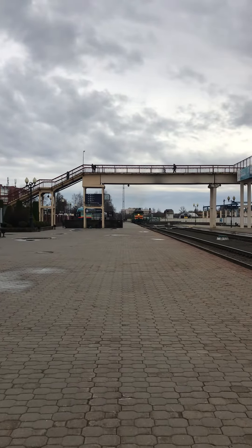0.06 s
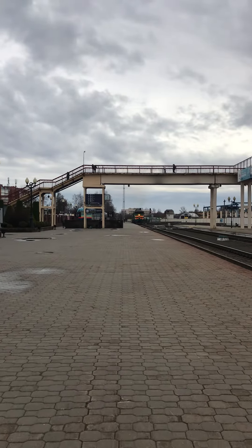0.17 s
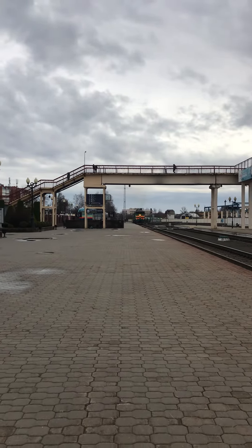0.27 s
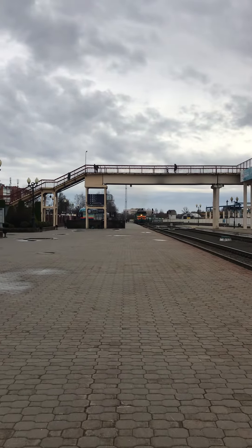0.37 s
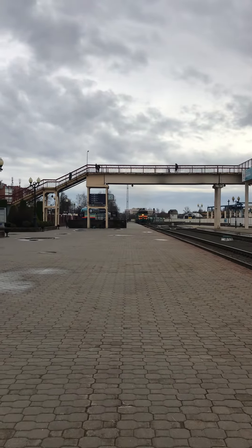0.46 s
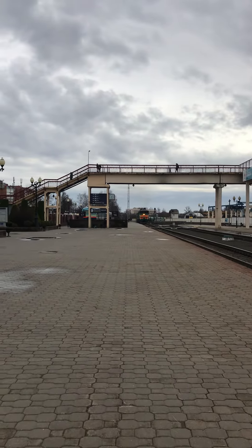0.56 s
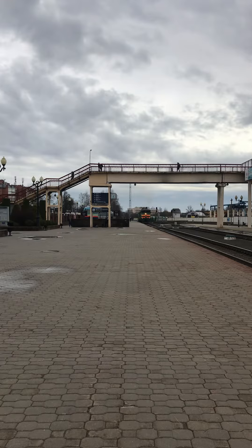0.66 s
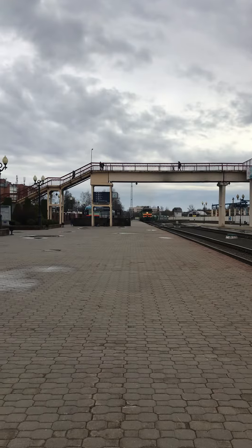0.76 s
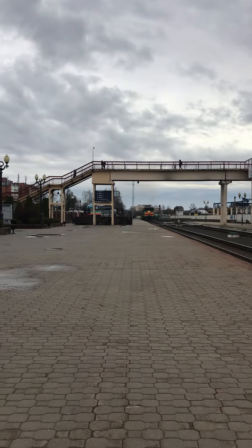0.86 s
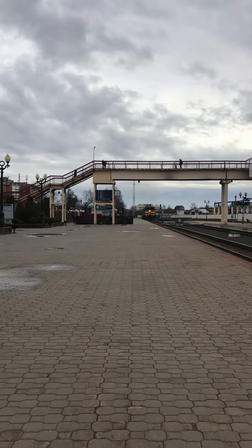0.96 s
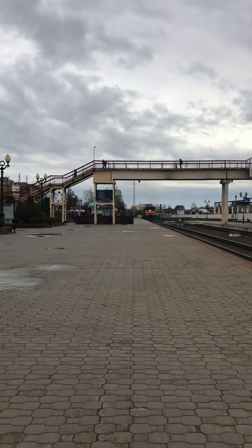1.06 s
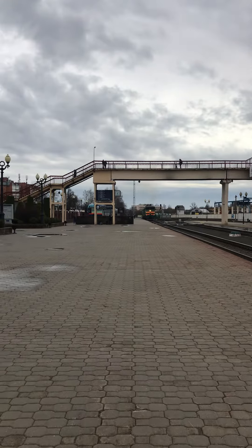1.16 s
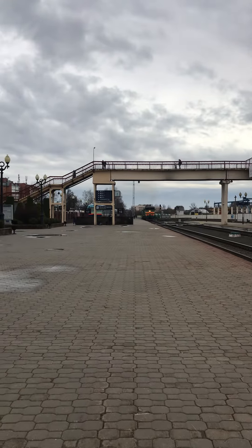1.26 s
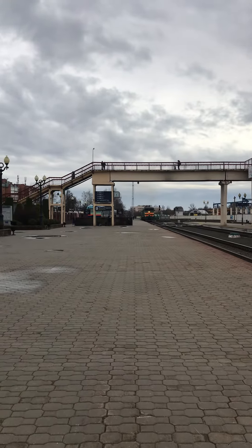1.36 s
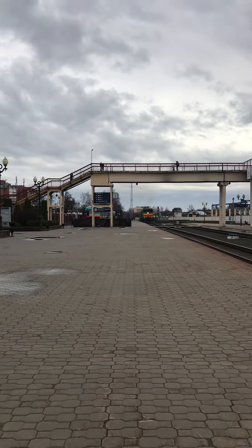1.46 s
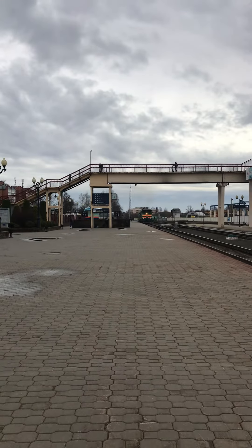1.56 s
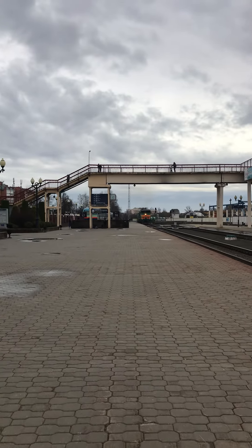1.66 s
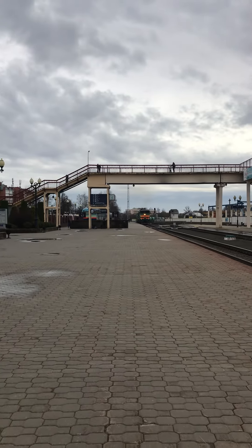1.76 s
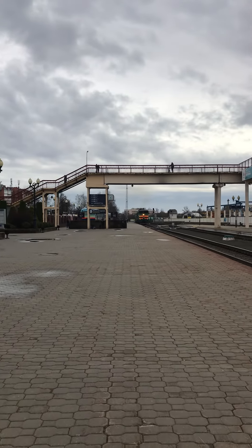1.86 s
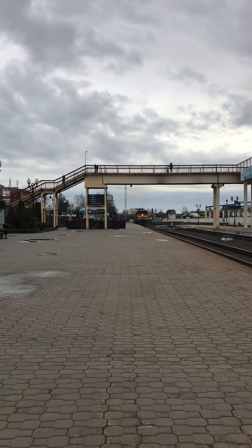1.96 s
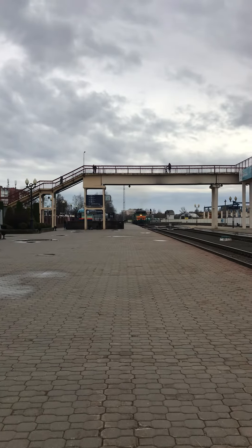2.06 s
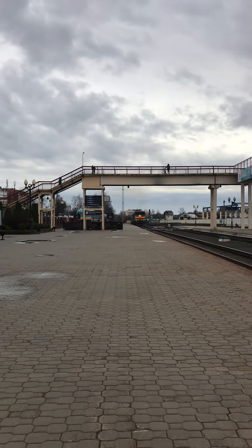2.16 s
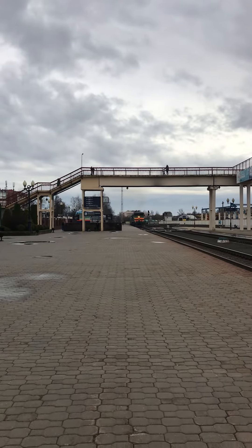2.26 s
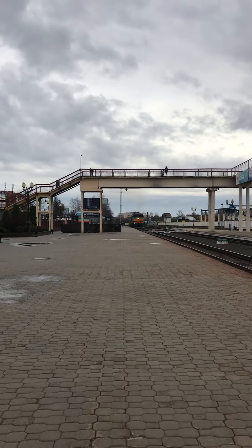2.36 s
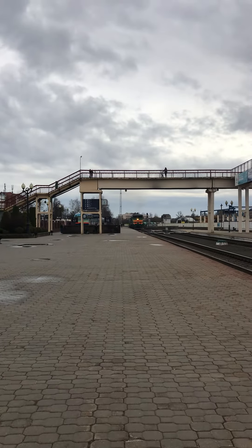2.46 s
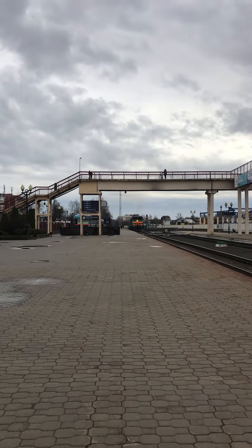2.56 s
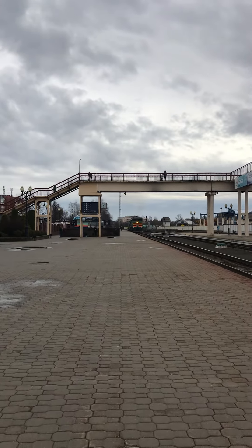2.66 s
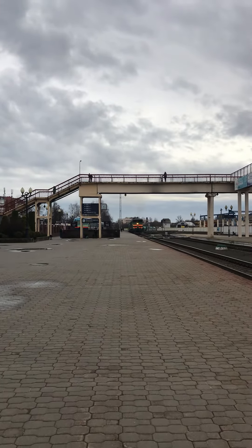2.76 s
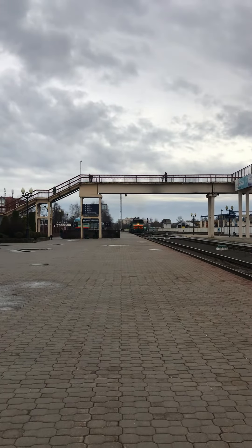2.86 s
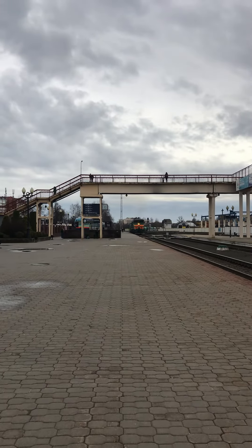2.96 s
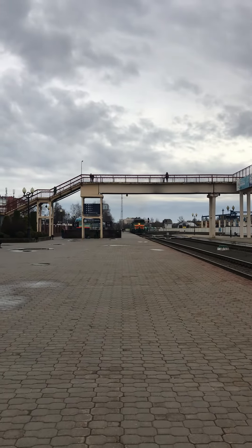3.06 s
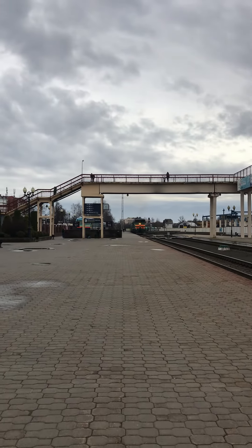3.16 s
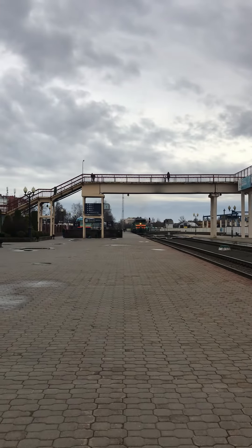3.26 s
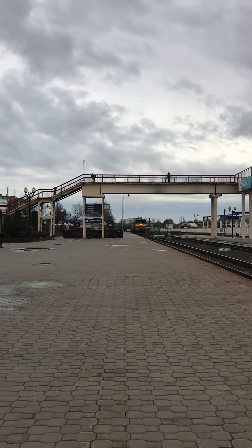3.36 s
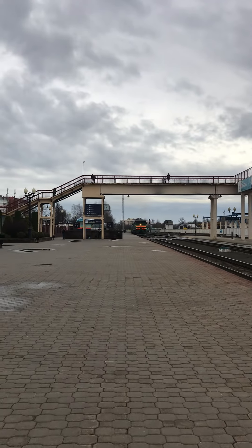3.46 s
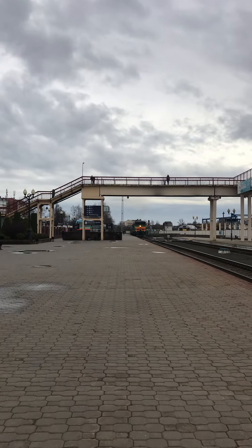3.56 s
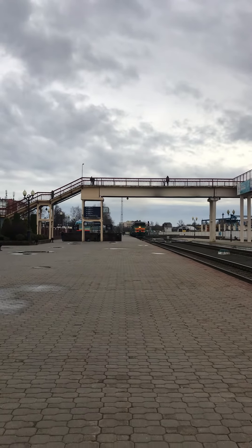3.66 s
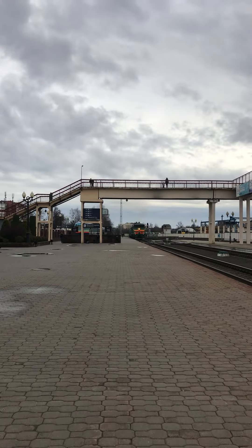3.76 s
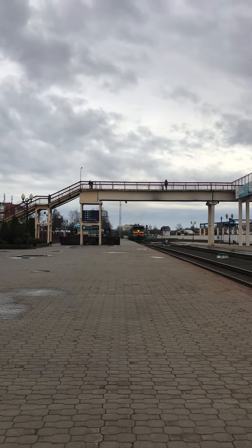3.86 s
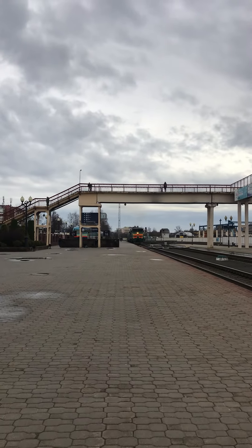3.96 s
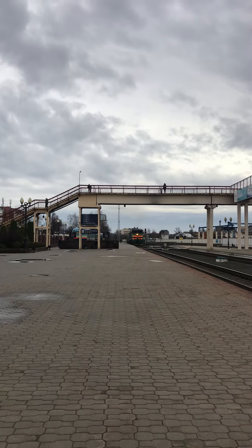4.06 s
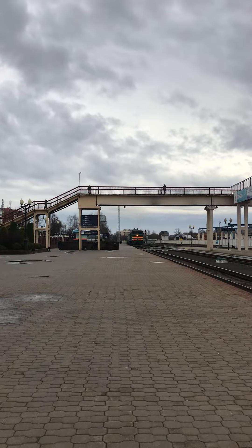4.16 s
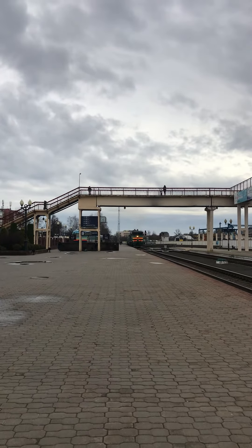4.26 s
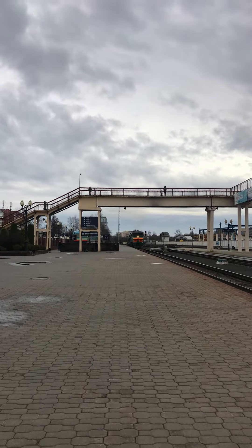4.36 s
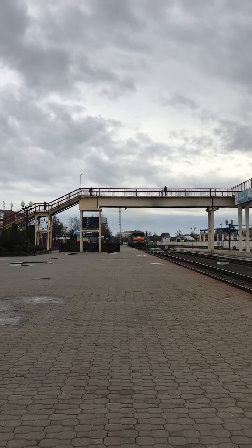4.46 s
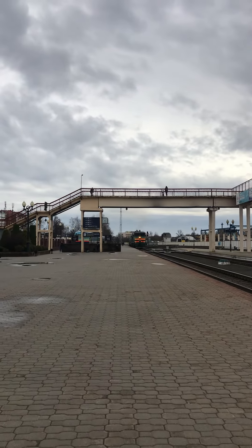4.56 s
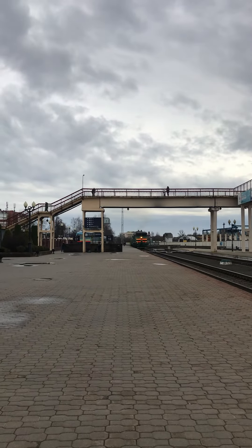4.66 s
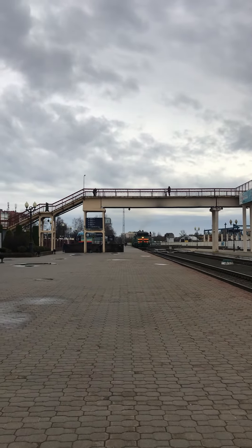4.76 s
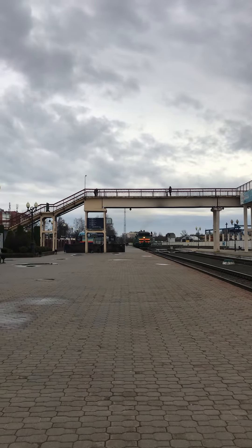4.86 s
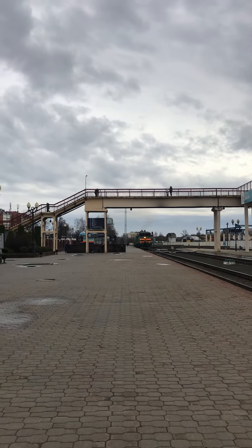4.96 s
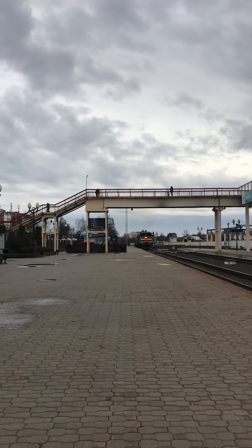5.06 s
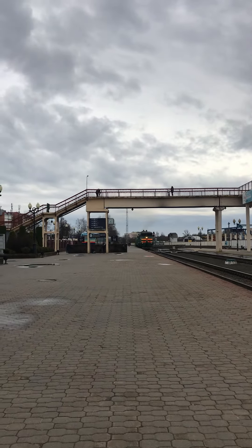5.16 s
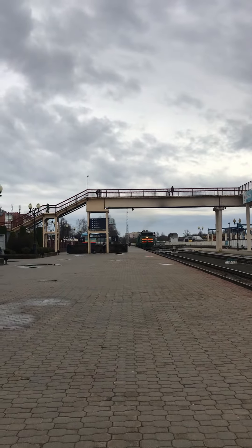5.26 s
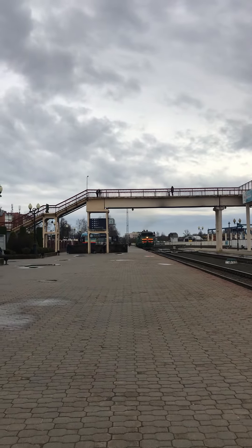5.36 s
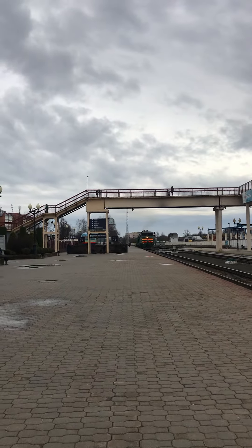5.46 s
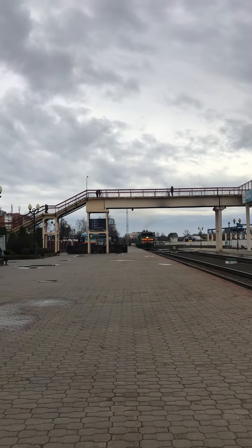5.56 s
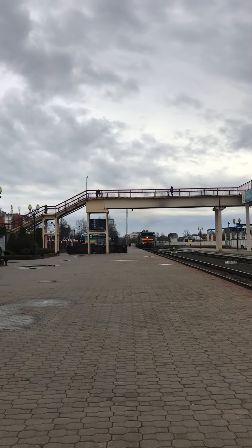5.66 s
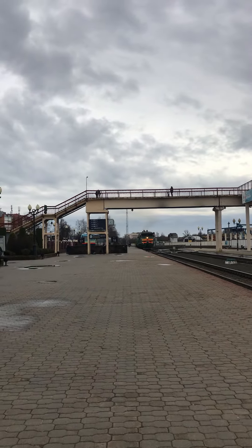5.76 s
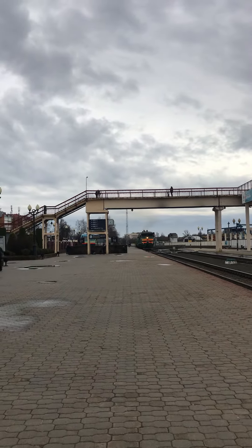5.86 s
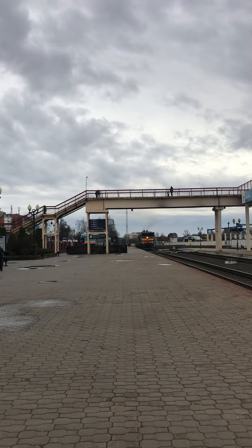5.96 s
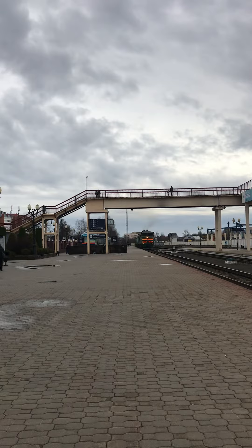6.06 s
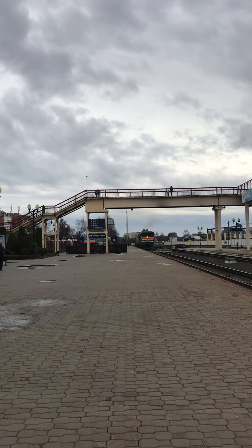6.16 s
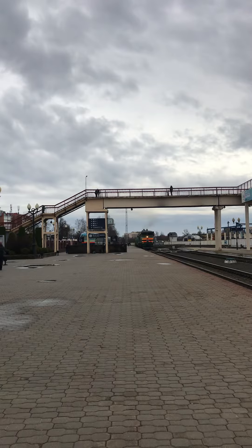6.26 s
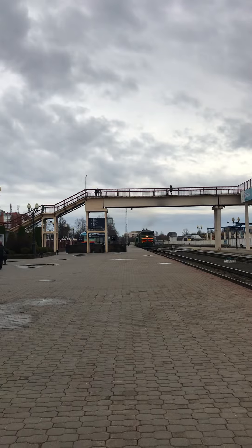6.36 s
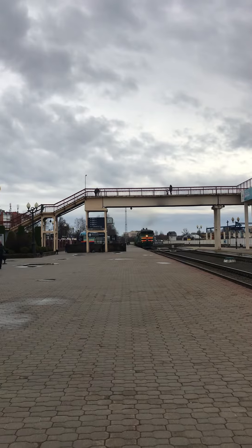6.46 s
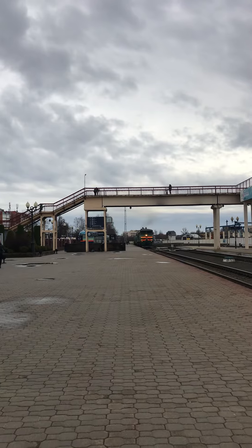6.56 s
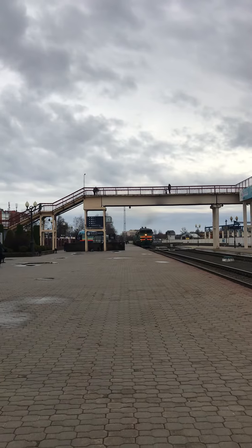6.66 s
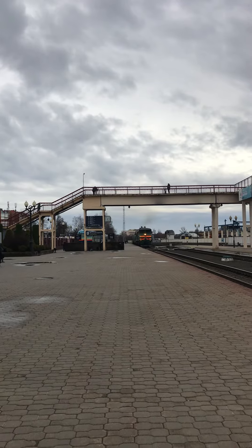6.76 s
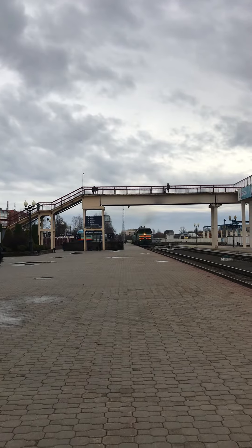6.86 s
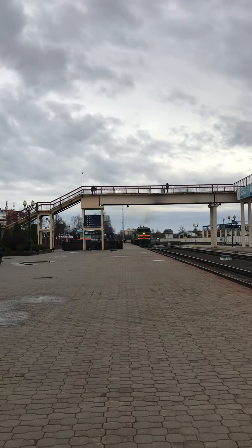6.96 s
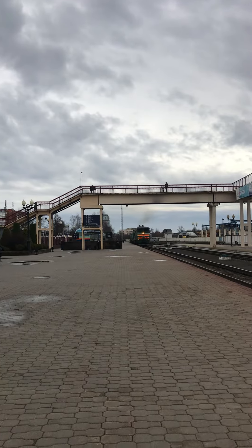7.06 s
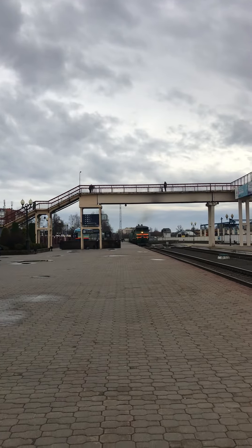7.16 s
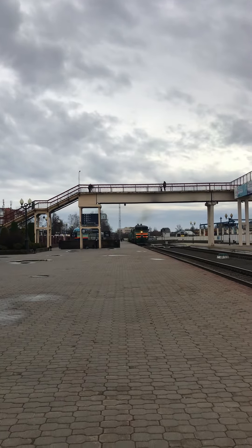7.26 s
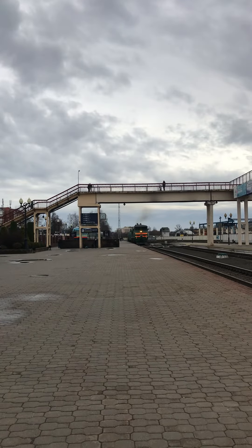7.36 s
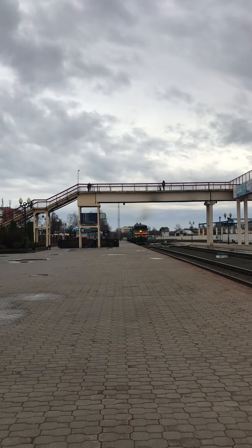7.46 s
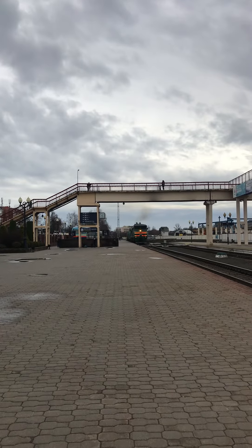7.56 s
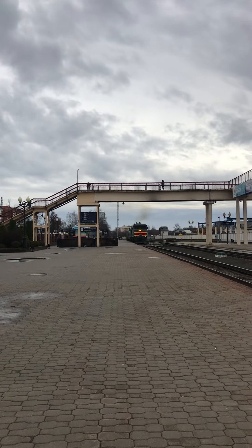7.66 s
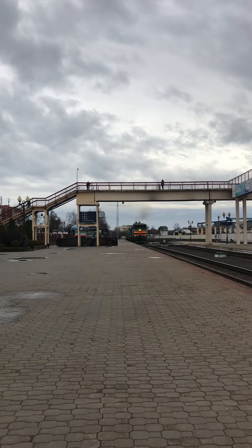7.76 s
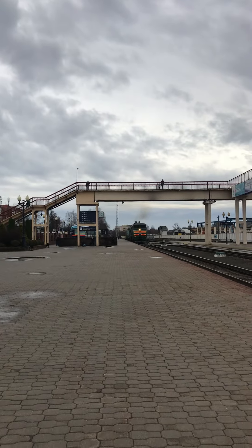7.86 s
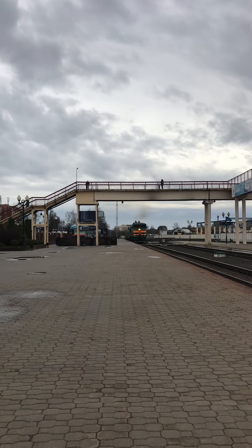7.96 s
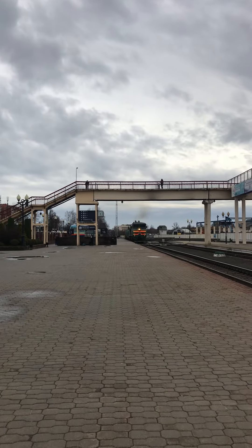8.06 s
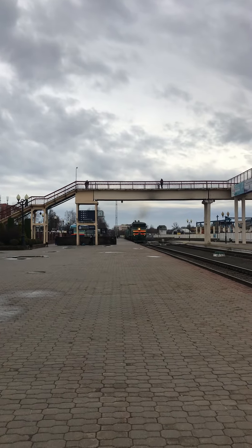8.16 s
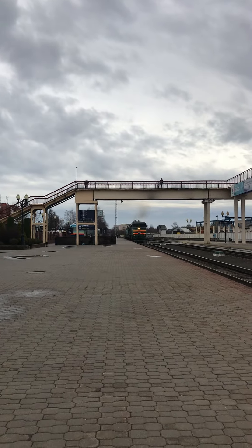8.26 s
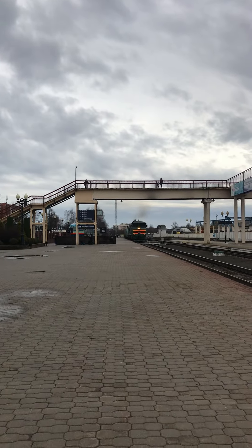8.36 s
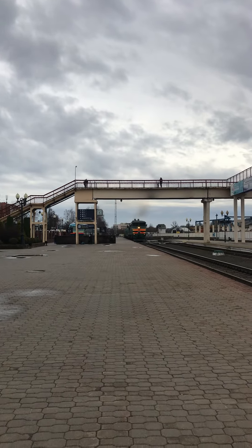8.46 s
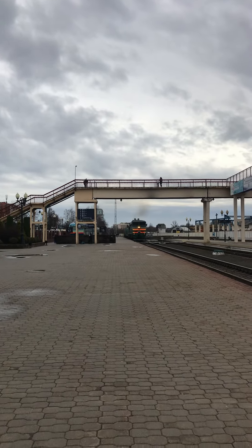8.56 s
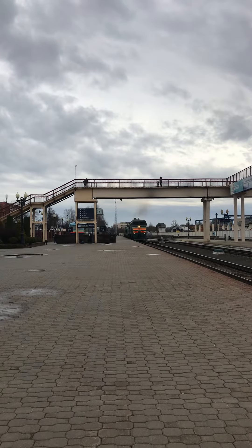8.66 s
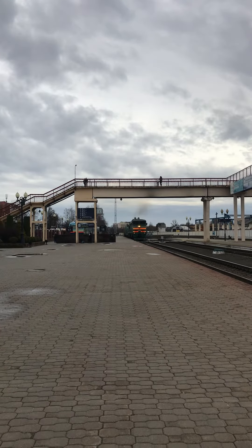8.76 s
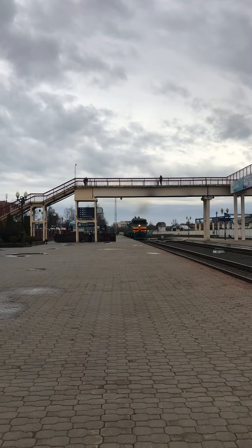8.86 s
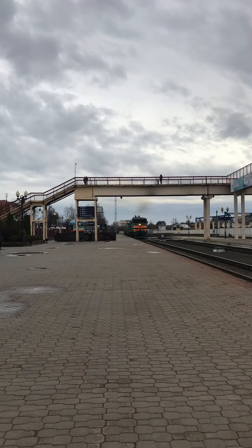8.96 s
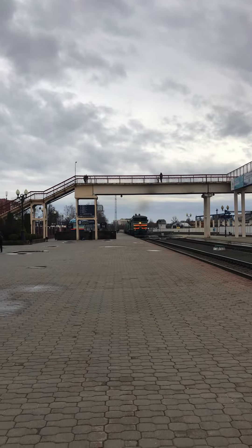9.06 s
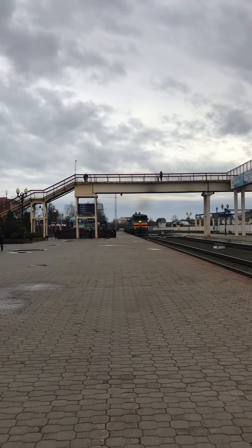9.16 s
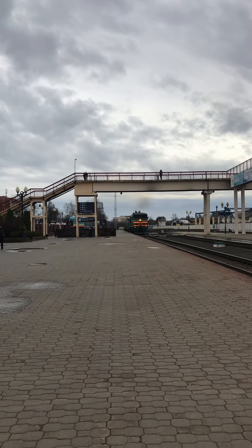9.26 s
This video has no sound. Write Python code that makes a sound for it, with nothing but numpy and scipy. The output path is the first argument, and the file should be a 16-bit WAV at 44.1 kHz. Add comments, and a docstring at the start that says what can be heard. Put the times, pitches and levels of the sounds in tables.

```python
"""A twin-unit diesel locomotive, heard from an open station platform, throttles up and sounds its horn.
Its two engines run slightly apart, so their exhausts throb; farther off, the freight's wheels roar and
blowers and turbochargers whine. Near the end the horn's diaphragm chops air into seven short blasts
that echo off the buildings. Clothing rustles close to the microphone."""
import sys
import numpy as np
from scipy import signal
from scipy.fft import rfft, irfft, next_fast_len
from scipy.io import wavfile

SR = 44100
rng = np.random.default_rng(int(sys.argv[2]) if len(sys.argv) > 2 else 0)


def transcribe(u):
    """Save the signal u as a 16-bit wav file named by the first command-line argument.

    u: samples, shape (n,) or (channels, n), limited to [-1, 1]; the rate is SR.
    q: integer samples, one column per channel.
    """
    v = np.clip(np.atleast_2d(u).T, -1, 1)
    q = np.round(v * 32767).astype(np.int16)
    wavfile.write(sys.argv[1], SR, q)


N = 410571
TIME = np.arange(N) / SR
FREQ = np.arange(N // 2 + 1) * SR / N
CRANK_HZ, THROTTLE_S, SPEEDUP_HZ_PER_S = 10.608, 4.6, .115  # leading engine

# spectra of cloth, wheels, exhaust gas and the horn's upper partials: (frequency [Hz], level [dB])
CLOTH_SPECTRUM = [(1500, -10), (4000, 8), (6000, 3), (9000, 6), (10500, -1.5), (11300, 4), (15500, 5.5)]
WHEEL_SPECTRUM = [(200, 3), (450, 0.5), (800, 0), (1300, -2.5), (1800, -7.5), (2500, -7.5), (2950, -10.5),
                  (3400, -9), (3800, -13.5), (4800, -21.5), (6500, -26), (8000, -33), (15000, -58)]
GAS_SPECTRUM = [(20, -22), (32, -17.5), (55, 6.5), (90, -1), (130, -1.5), (185, -1.5), (225, -4.5),
                (280, -2), (350, -8.5), (440, -18.5), (800, -55)]
HORN_SPECTRUM = [(1090, -5.5), (1450, -7.5), (1800, -9.5), (2180, -9), (2500, -8.5), (3300, -9.5),
                 (4000, -13.5), (4700, -19), (6000, -19.5), (7000, -24.5), (8000, -30), (9500, -33),
                 (10500, -40), (11300, -36), (13500, -42.5), (15800, -50)]
# sleeves rubbing by the microphone: (start [s], length [s], level [dB])
SLEEVE_RUBS = [(1.716, 0.98, -59), (2.658, .53, -64), (3.4, .07, -57), (4.367, 0.23, -61),
               (4.863, 0.24, -54), (5.794, 0.13, -56), (6.004, 0.076, -55.5), (6.5, .22, -64)]
# folds of cloth snapping: (time [s], level [dB], length [s], low edge [Hz])
FOLD_SNAPS = [(.094, -51, 0.0058, 6000), (0.4, -52, .006, 5000), (.49, -68, 0.024, 5000),
              (0.943, -47, 0.0022, 9000), (1.066, -53, .003, 8000), (2.456, -41.5, 0.024, 4520),
              (3.607, -41.5, 0.011, 5000), (4.156, -33, 0.01, 4040), (4.756, -37.5, .005, 5500),
              (5.054, -41, 0.02, 3500), (5.243, -35, 0.0024, 6500), (5.327, -36, 0.0056, 5500),
              (5.83, -27, 0.014, 2400), (5.882, -37, 0.0081, 5500), (6.622, -48, .003, 8000),
              (7.07, -48, 0.0044, 7260), (7.648, -41, .005, 7000)]
# blower whine, turbocharger whine and hiss before the speed-up: (frequency [Hz], width [Hz], level [dB])
BLOWER_TONES = [(1364, 10, 0.5), (3310, 30, -3), (3450, 25, -8)]
TURBO_TONES = [(5170, 28, 0), (5190, 110, 0)]
TURBO_HISS = [(5720, 230, -61.5), (5970, 75, -64)]
# swell of the turbocharger whine: (time [s], level [dB])
TURBO_SWELL = [(0, -69), (3.5, -64.5), (3.95, -57), (5.5, -59.5), (5.7, -64), (5.95, -53.5), (6.85, -57.5)]
# exhaust lines: (order [multiple of crank rate], leading engine [dB], second engine [dB])
EXHAUST_LINES = [(3, -56, -50.5), (4, -44.5, -47), (5, -51, -57), (6, -51, -32.5), (7, -22, -26.5),
                 (8, -42.5, -84), (9, -87, -34), (10, -35.5, -30.5), (11, -37.5, -32.5), (12, -50, -35),
                 (13, -34, -29.5), (14, -43.5, -50), (15, -36.5, -38), (16, -26.5, -36), (17, -32, -52),
                 (18, -73.5, -42), (19, -43.5, -71), (20, -60, -44.5)]
# how much faster the second engine fires: (time [s], beat rate [Hz])
ENGINE_BEAT = [(0.0, 2.39), (1.1, 2.01), (2.4, 2.47), (3.4, 1.71), (5.7, 2.58), (6.8, 3.34), (8.1, 3.48),
               (9.3, 2.2)]
# swell of the firing tone: (time [s], both engines [dB], extra for the second engine [dB])
FIRING_SWELL = [(0, -1.5, 1), (.95, 0.5, -10), (1.65, -6, -1.5), (2.2, 0, -0.5), (3.2, 1.9, -5.5),
                (3.72, 0, 3.5), (4.25, 0, -5), (4.7, -1, 2), (5.6, 1.5, -0.5), (6.3, -3.5, 1), (9.3, -3, 1)]
# swells of the exhaust drone near 110 Hz and of the remaining lines: (time [s], level [dB])
DRONE_SWELL = [(0.1, 10), (.7, -1.5), (1.55, 8.5), (2.1, -5), (3.05, 7), (3.8, -17), (4.2, 5), (5.6, 4),
               (6.4, 13.5), (7.6, 8), (8.6, 14.5), (9.3, -5)]
OTHER_SWELL = [(0, -13), (.9, -7), (5.3, -2.04), (7.3, -4), (9.3, 0.5)]
# air horn blasts: (valve opens [s], valve shuts [s], full pitch [Hz], fundamental [dB],
# bell resonance at the octave [dB], upper partials [dB], treble [dB])
HORN_BLASTS = [(6.924, 7.137, 363.7, -21, -18, -22, -0.5), (7.414, 7.657, 364.1, -19, -20.5, -22, 0.5),
               (7.867, 8.018, 364.6, -18.5, -24.5, -21.5, -1), (8.111, 8.277, 365.1, -18.5, -23.5, -22, 1),
               (8.367, 8.539, 363.2, -20.5, -18.5, -23, 1), (8.819, 8.973, 367, -22, -18, -23, 2.5),
               (9.055, 9.228, 366.2, -21, -20, -22.5, 2)]


def undb(db):
    """Decibels to gain."""
    return 10 ** (np.asarray(db) / 20)


def unit(x):
    """Scale to rms 1."""
    return x / np.sqrt(np.mean(x ** 2))


def curves(table):
    """Each column after the first as a curve over time."""
    times, *columns = np.transpose(table)
    return [np.interp(TIME, times, column) for column in columns]


def colour(spectrum, hz=FREQ):
    """Gain of a spectrum at the given frequencies."""
    points_hz, db = np.transpose(spectrum)
    return undb(np.interp(np.log(hz + 1e-9), np.log(points_hz), db))


def shape(x, gain):
    """Filter by a gain per frequency; rms 1."""
    size = next_fast_len(N, real=True)
    bin_gain = np.interp(np.arange(size // 2 + 1) * SR / size, FREQ, gain)
    return unit(irfft(rfft(x, size) * bin_gain, size)[:N])


def noise():
    """White noise."""
    return rng.standard_normal(N)


def walk(rate_hz):
    """Smooth random wander with a spread near 1."""
    knots = rng.standard_normal(16384)
    place = TIME * rate_hz
    i = place.astype(int)
    u = place - i
    return knots[i] + (knots[i + 1] - knots[i]) * u * u * (3 - 2 * u)


def nearing(start_db, rise_db_per_s):
    """Level in dB of a part of the train as it nears the platform."""
    return start_db + rise_db_per_s * TIME


def crank_rate():
    """Crankshaft turns per second: steady, then climbing once the throttle opens."""
    return CRANK_HZ + SPEEDUP_HZ_PER_S * np.maximum(TIME - THROTTLE_S, 0)


def rubbing(attack_s=.04, release_s=.024, rest_db=-67.5):
    """Strength of the sleeves' sliding: each rub swells, holds and lets go."""
    strength = undb(rest_db)
    for start, length, db in SLEEVE_RUBS:
        ramp = np.minimum((TIME - start) / attack_s, (start + length - TIME) / release_s)
        strength = strength + undb(db) * np.clip(ramp + 1, 0, 1)
    return strength


def clothing(rustle_db=-2, grain_db=8, patchy_db=3.5, snap_db=-1):
    """Right at the microphone, fibres slip in dense tiny clicks; now and then a fold snaps."""
    cloth = colour(CLOTH_SPECTRUM)
    fibres = shape(noise() * undb(grain_db * noise()), cloth)
    out = fibres * rubbing() * undb(rustle_db + patchy_db * walk(25))
    scuff = shape(noise() * undb(1.8 * walk(900)), cloth)
    for start, db, length, low_hz in FOLD_SNAPS:
        span = slice(int(start * SR), int(start * SR) + SR // 8)
        age = np.arange(SR // 8) / SR / (length / 2)
        burst = scuff[span] * age * np.exp(1 - age)
        band_hz = [low_hz, min(2.42 * low_hz, .45 * SR)]  # larger folds sound lower
        fold = signal.butter(2, band_hz, "band", fs=SR, output="sos")
        out[span] += undb(db + snap_db) * signal.sosfilt(fold, burst)
    return out


def wheels(flicker_db=.82, low_cut_hz=200):
    """Wheels roar on the rails, far down the line."""
    roar = shape(noise(), colour(WHEEL_SPECTRUM) * FREQ / np.hypot(FREQ, low_cut_hz))
    return roar * undb(nearing(-45.5, .89) + flicker_db * walk(5.8))


def blade_tones(tones, swell_db, spool=.53):
    """Spinning blades give fluttering bands of sound that rise in pitch with the engines."""
    spin = np.cumsum((crank_rate() / CRANK_HZ) ** spool) / SR
    out = 0
    for hz, width, db in tones:
        flutter = .6 + .63 * (walk(2 * width) + 1j * walk(2 * width))
        angle = 2 * np.pi * hz * spin + width / 70 * walk(2 * width)
        out = out + undb(swell_db + db) * np.real(flutter * np.exp(1j * angle))
    return out


def blowers():
    """Blower blades whine in the distance, growing as the train nears."""
    return blade_tones(BLOWER_TONES, nearing(-58, 1))


def turbochargers():
    """Distant turbochargers give a high whine under two bands of hiss."""
    swell_db, = curves(TURBO_SWELL)
    return blade_tones(TURBO_TONES, swell_db) + blade_tones(TURBO_HISS, nearing(-2.4, .96))


def exhausts(firing_order=7, firing_db=.5, drone_order=10, drone_db=-8, waver_db=2.5, wander_rad=.47):
    """Two approaching exhausts: a firing tone among the lines of unequal cylinders, over gas rumble."""
    firing_swell, second_extra = curves(FIRING_SWELL)
    drone_swell, = curves(DRONE_SWELL)
    other_swell, = curves(OTHER_SWELL)
    beat_hz, = curves(ENGINE_BEAT)
    lead_turns = np.cumsum(crank_rate()) / SR
    firings_ahead = np.cumsum(beat_hz) / SR + .5  # the engines start half a firing apart
    second_turns = lead_turns + firings_ahead / firing_order
    lines = 0
    for order, lead_db, second_db in EXHAUST_LINES:
        for turns, db, extra_db in ((lead_turns, lead_db, 0), (second_turns, second_db, second_extra)):
            angle = 2 * np.pi * order * turns
            if order == firing_order:
                lines = lines + undb(db + firing_swell + extra_db + firing_db) * np.sin(angle)
            else:  # moving air shifts the level and phase of the weaker lines
                drift = 2 * np.pi * rng.random() + wander_rad * walk(3)
                swell = drone_swell + drone_db if order == drone_order else other_swell
                lines = lines + undb(db + swell + waver_db * walk(2.107)) * np.sin(angle + drift)
    rumble = shape(noise(), colour(GAS_SPECTRUM))
    return np.sqrt(2) * lines + rumble * undb(nearing(-36, .46))


def station_echoes(direct, near_s=.085, near_db=-5, far_s=.19, far_db=-10, tail_db=-4, t60_s=1.0):
    """A building front slaps back, a farther one more dully; footbridge and yard scatter a tail."""
    t = TIME[:SR]
    tail = rng.standard_normal(SR) * undb(-60 * t / t60_s) * (1 - np.exp(-t / .029))
    scattered = signal.fftconvolve(direct, tail / np.linalg.norm(tail))[:N]
    near = np.interp(TIME - near_s, TIME, direct)
    dull = signal.butter(2, 1800, fs=SR, output="sos")
    far = signal.sosfilt(dull, np.interp(TIME - far_s, TIME, direct))
    returns = undb(tail_db) * scattered + undb(near_db) * near + undb(far_db) * far
    # small surfaces return little bass, and the air takes the top
    band = signal.butter(2, [850, 8000], "band", fs=SR, output="sos")
    return direct + signal.sosfilt(band, returns)


def horn_pressure(rise_s=.032, fall_s=.04):
    """Air pressure, 0 to 1, builds as the valve opens and drains when it shuts."""
    pressure = 0
    for opens, shuts, *_ in HORN_BLASTS:
        filling = 1 - np.exp(-np.maximum(TIME - opens, 0) / rise_s)
        draining = np.exp(-np.maximum(TIME - shuts, 0) / fall_s)
        pressure = pressure + filling * draining
    return np.clip(pressure, 0, 1)


def air_horn(sag_hz=6.5, jitter=.0013, dull_db=5, air_db=-18, spread_rad=.069):
    """Up the track, a diaphragm chops air into a brassy tone, sharper and brighter with pressure."""
    pressure = horn_pressure()
    held_settings = [(time, *blast[2:]) for blast in HORN_BLASTS for time in blast[:2]]
    full_hz, fundamental_db, bell_db, upper_db, treble_db = curves(held_settings)
    pitch_hz = full_hz - sag_hz * (1 - pressure)
    angle = 2 * np.pi * np.cumsum(pitch_hz * (1 + jitter * walk(140))) / SR
    tone = 0
    # the two lowest partials speak first, linger longest and waver only gently in the moving air
    for k, db in ((1, fundamental_db), (2, bell_db)):
        gain = np.sqrt(2) * pressure ** .42 * undb(db + 1.5 * walk(24))
        tone = tone + gain * np.sin(k * angle + .66 * walk(24))
    upper_gain = pressure ** .7 * undb(upper_db)
    bright_db = treble_db - dull_db * (1 - pressure)
    for k in range(3, 44):
        partial_hz = k * full_hz[-1]
        treble_share = np.clip((partial_hz - 2500) / 4000, 0, 1)
        gain = colour(HORN_SPECTRUM, partial_hz) * upper_gain * undb(treble_share * bright_db)
        phase = k * angle + .5 * rng.normal() + spread_rad * k * k  # the bell spreads each pulse
        # turbulence along the track flutters each partial on its own, short waves deeper and faster
        depth, rate_hz = .6 * np.tanh(partial_hz / 2000), 26 + 1.5 * k
        partial = (1 + depth * walk(rate_hz)) * np.sin(phase) + depth * walk(rate_hz) * np.cos(phase)
        tone = tone + gain * unit(partial)
    # air hisses through the gap once a cycle
    air = shape(noise() * (1 + np.cos(angle)), colour(HORN_SPECTRUM))
    return tone + air * upper_gain * undb(air_db)


def scene():
    """Everything as it reaches one microphone on the platform."""
    train = exhausts() + wheels() + blowers() + turbochargers()
    return (train + station_echoes(air_horn()) + clothing())[None]


def record(dry, top_hz=15800):
    """The phone on the platform cuts the top treble steeply."""
    return signal.sosfilt(signal.ellip(10, .2, 70, top_hz, fs=SR, output="sos"), dry)


dry = scene()
out = record(dry)
transcribe(out)
```